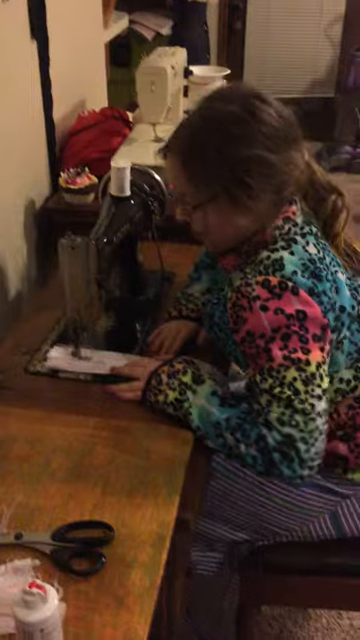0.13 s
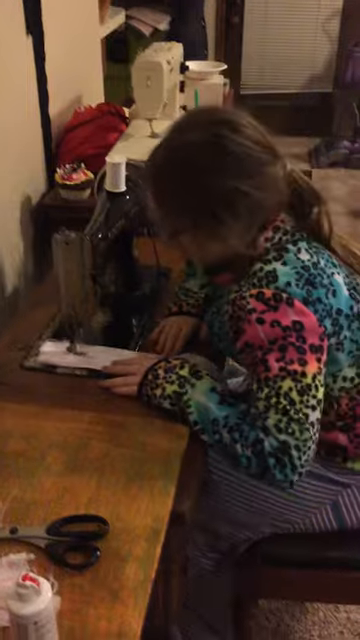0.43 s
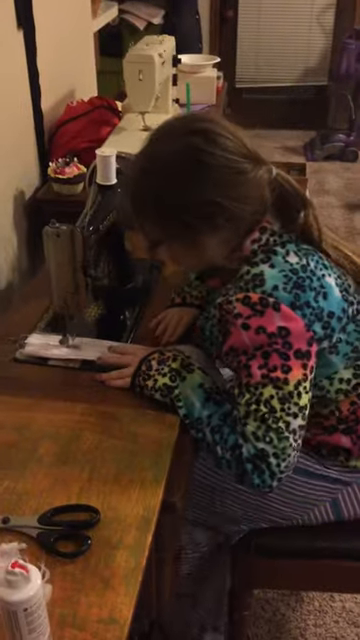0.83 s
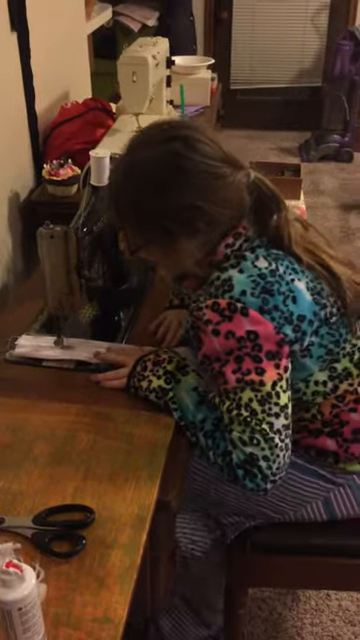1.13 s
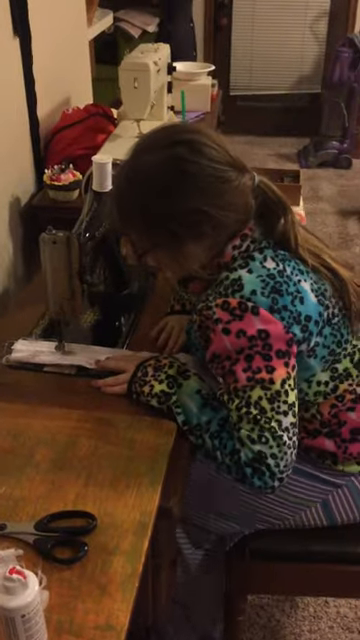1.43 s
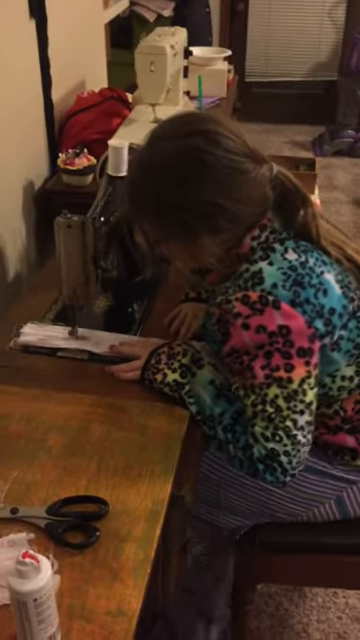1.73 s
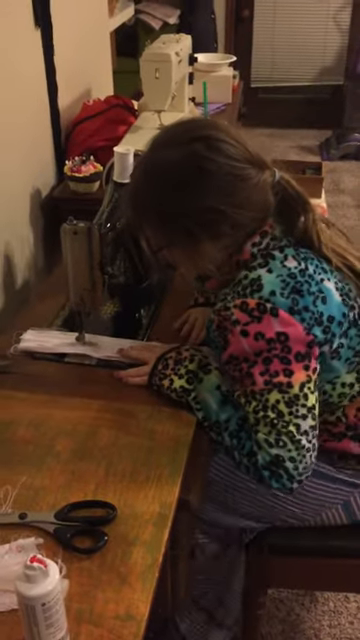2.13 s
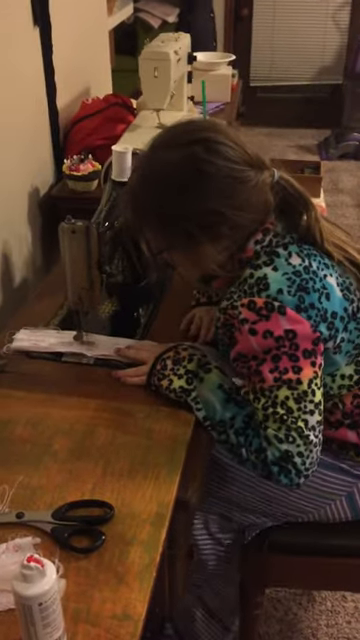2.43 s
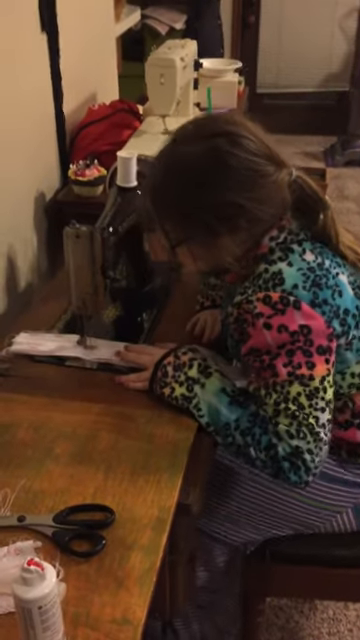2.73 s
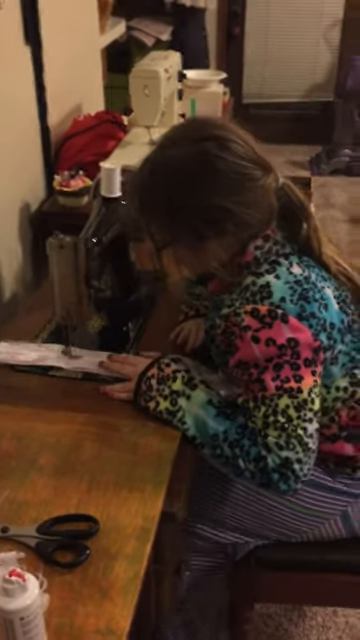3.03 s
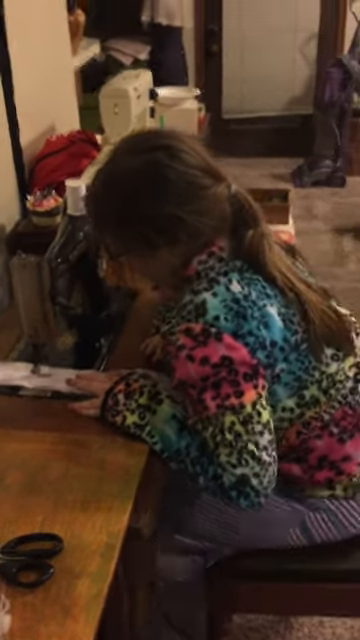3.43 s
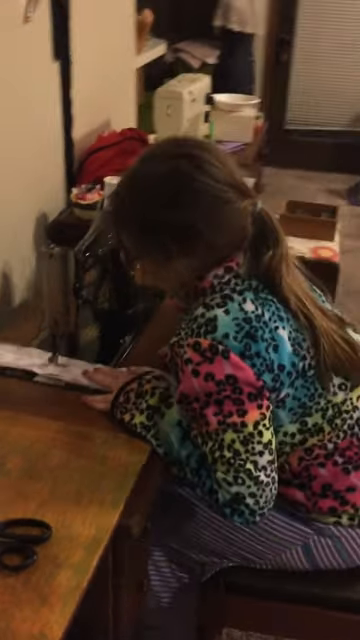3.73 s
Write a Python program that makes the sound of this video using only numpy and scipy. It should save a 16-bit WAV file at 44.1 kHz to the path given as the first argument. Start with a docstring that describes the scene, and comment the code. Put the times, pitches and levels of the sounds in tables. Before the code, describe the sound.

An old iron sewing machine starts abruptly and keeps stitching, slightly slower at first, then about ten stitches a second; dry squeaks, metallic clicks, table thumps and wooden treadle knocks, heard nearby in mono indoors.

```python
"""After a moment of silence a treadle sewing machine is heard at about ten stitches a second in a small room.
Filtered noise makes the cabinet drone and dense noise contacts the rattle; both follow the drive.
Each turn, a gliding sine and its octave squeak, a ringing push thumps the table, a noise burst clacks;
then the joint squeaks back and rasps upwards, and shuttle and feed click in between.
From time to time the treadle knocks: decaying modes of the wooden cabinet under a low noise grumble."""
import sys
import numpy as np
from scipy import signal
from scipy.fft import rfft, irfft
from scipy.io import wavfile
from scipy.ndimage import uniform_filter1d

SR = 44100
rng = np.random.default_rng(int(sys.argv[2]) if len(sys.argv) > 2 else 0)


def put_to_file(sound):
    """Save the sound as 16-bit audio at rate SR, in the file named by the first command-line argument."""
    columns = np.atleast_2d(sound).T  # one column per channel
    safe = np.clip(columns, -1, 1)
    whole_steps = np.round(safe * 32767)
    wavfile.write(sys.argv[1], SR, whole_steps.astype(np.int16))


N = 171549

# stitches: (time [s], squeak lead [s], squeak relative level [dB], squeak base pitch [Hz],
# squeak octave relative level [dB], return squeak relative level [dB], rasp relative level [dB],
# needle-bar clack relative level [dB], table thump relative level [dB])
STITCHES = [(0.146, 0.005, -23.5, 6940, -29, -51, -61, -32, -50),
            (0.274, 0.014, -52, 6730, -53, -47.5, -56, -40, -46),
            (0.395, 0.0072, -26, 7000, -30, -35.5, -50, -37, -44.5),
            (0.525, 0.0105, -38, 6870, -50.0, -40.5, -52.0, -40, -37.5),
            (0.649, 0.0091, -24, 7050, -32, -40, -52.0, -29.5, -36),
            (0.752, 0.0076, -23.5, 7000, -29, -41, -52, -30.5, -41),
            (0.86, 0.0071, -24.5, 6920, -31, -43, -43.0, -38, -47),
            (0.973, 0.0091, -25.5, 6920, -31.5, -46, -52.0, -35.5, -37),
            (1.083, 0.004, -32, 6820.0, -53, -52, -50, -35, -45),
            (1.185, 0.008, -22, 7040, -27.5, -32.5, -40.5, -30, -50),
            (1.277, 0.011, -24.5, 6780, -30, -35, -52.0, -29, -36.5),
            (1.371, 0.0093, -23.5, 7020.0, -29.0, -37, -43.5, -38, -32),
            (1.471, 0.0118, -34, 6880, -50.0, -34.5, -55, -31, -30.5),
            (1.568, 0.0053, -29.5, 6870.0, -48.5, -37, -52.0, -31, -37),
            (1.664, 0.0084, -22, 6890.0, -25, -30, -35.5, -30, -41),
            (1.747, 0.0102, -23, 6950, -26.5, -31, -42.5, -32.0, -38),
            (1.843, 0.0104, -27, 6860, -42, -47, -53, -31.5, -43),
            (1.937, 0.011, -23.5, 6940, -28, -38, -52.0, -30.5, -29),
            (2.037, 0.0095, -23.5, 6990, -26, -31.5, -36, -31.0, -39),
            (2.126, 0.021, -30.0, 6750, -43, -42, -52.0, -30, -35.5),
            (2.209, 0.01, -22.5, 6860.0, -30, -33.0, -41.0, -27.5, -35),
            (2.302, 0.01, -22.5, 6900, -26.5, -36.5, -45.5, -29, -50),
            (2.397, 0.01, -22.5, 6990, -29, -39, -42.5, -34.5, -33.0),
            (2.497, 0.0087, -27.5, 6800, -35, -49, -51.0, -30.5, -42),
            (2.584, 0.01, -41, 6960, -50.0, -34.5, -43, -31.5, -39),
            (2.672, 0.0098, -23.5, 7080, -28, -38, -52, -32, -36),
            (2.769, 0.0088, -20.5, 6915, -25.5, -33, -53, -31.5, -35),
            (2.866, 0.0083, -24, 6980, -28.5, -32.0, -50, -33.5, -32),
            (2.964, 0.0094, -24.5, 6880, -25.5, -33.5, -48.5, -29.5, -38),
            (3.051, 0.01, -23.5, 6870, -30.0, -38, -44, -30.5, -40),
            (3.138, 0.011, -25.5, 7030, -30, -38, -45.0, -29.5, -33),
            (3.233, 0.01, -26, 7050, -29.0, -34.5, -51.0, -32.5, -37.5),
            (3.332, 0.0095, -26, 7080, -32, -33.5, -45, -33.5, -36.5),
            (3.433, 0.0085, -20.5, 6910, -31, -30.0, -39.5, -30, -39.5),
            (3.529, 0.0103, -24, 7030, -31, -35.5, -42, -32.5, -44),
            (3.63, 0.0088, -28, 7140, -32.5, -53, -55, -34.5, -33.5),
            (3.742, 0.0121, -31, 6980.0, -36.5, -40.5, -61, -30.5, -33.5),
            (3.859, 0.009, -27, 7000, -34.5, -44, -43, -41, -33.5)]
# treadle knocks at the ends of its strokes: (time [s], relative level [dB], main ring [Hz])
KNOCKS = [(0.24, -24.5, 354), (0.452, -30, 323), (.806, -24, 345), (1.002, -25, 283.4), (1.294, -29, 349),
          (1.783, -21.5, 361), (1.9, -21, 282), (2.228, -24, 358), (2.355, -18.5, 274.2), (2.668, -30, 384),
          (3.124, -24, 346), (3.592, -25.5, 346)]
TABLE_HZ = 273  # main ring of the table top
RETURN_DELAY_S = .024  # stitch to middle of the rasp and of the return squeak's octave


def undb(db):
    """Decibels to gain."""
    return 10 ** (np.asarray(db) / 20)


def level(x, db):
    """Set the rms level."""
    return x * undb(db) / np.sqrt(np.mean(x ** 2))


def curve(at, rows):
    """Straight lines through the rows."""
    return np.interp(at, *np.array(rows).T)


def walk(rate_per_s):
    """Smooth random motion with an rms of 1."""
    k = max(int(SR / rate_per_s), 1)
    steps = np.repeat(rng.standard_normal(N // k + 1), k)
    return level(uniform_filter1d(steps, k)[:N], 0)


def convolve(x, response):
    """Play x through a response."""
    return signal.fftconvolve(x, response)[:N]


def colour(x, points, size=8192):
    """Causal minimum-phase filter of unit power, shaped by (frequency [Hz], relative level [dB])."""
    hz, db = np.array(points).T
    bin_hz = np.arange(size // 2 + 1) * SR / size
    gain = level(undb(np.interp(np.log(bin_hz + 1), np.log(hz), db)), 0)
    cepstrum = irfft(np.log(gain))
    cepstrum[1:size // 2] *= 2
    cepstrum[size // 2 + 1:] = 0
    return convolve(x, irfft(np.exp(rfft(cepstrum))))


def decay(t, t60_s):
    """Exponential decay by 60 dB in t60_s."""
    return np.exp(-np.log(1000) * t / t60_s)


def ring(t, hz, t60_s):
    """A mode that dies away from t = 0."""
    return np.sin(2 * np.pi * hz * t) * decay(t, t60_s)


def blows(t, rows, rise_s, decay_s):
    """Hard contacts: a short noise burst from each (time [s], level [dB])."""
    force = np.zeros(N)
    for s, db in rows:
        force += undb(db) * np.clip((t - s) / rise_s, 0, 1) * np.exp(-np.abs(t - s) / decay_s)
    return force * rng.standard_normal(N)


def head(x, points):
    """The iron head colours a blow and rings on at its modes."""
    # rings of the iron head: (frequency [Hz], t60 [s], gain [dB])
    head_modes = [(572, .14, 0), (728, .12, -6), (1122, .2, 3), (1656, .08, -10), (2483, .15, -5),
                  (3644, .12, -7), (5480, .1, -8), (5810, .08, -5)]
    t = np.arange(SR // 2) / SR
    modes = np.zeros(len(t))
    for hz, t60_s, db in head_modes:
        unit_peak = 2 * np.log(1000) / (t60_s * SR)  # gain of about 1 at resonance
        modes += undb(db) * unit_peak * np.cos(2 * np.pi * hz * t) * decay(t, t60_s)
    blow = colour(x, points)
    return blow + convolve(blow, modes)


def room(x, tail_db):
    """Direct sound plus the short tail of a furnished room, which soaks up the highest treble."""
    t60_s, onset_s, top_hz = 0.26, 0.0027, 11700
    t = np.arange(SR // 2) / SR
    tail = rng.standard_normal(len(t)) * decay(t, t60_s) * np.clip(t / onset_s - 1, 0, 1)
    soft = signal.sosfilt(signal.butter(1, top_hz, fs=SR, output="sos"), tail)
    return x + undb(tail_db) * convolve(x, soft / np.sqrt(np.sum(tail ** 2)))


def drone(drive):
    """The running flywheel and belt shake the cabinet and keep the table top ringing."""
    # colour of the wooden cabinet: (frequency [Hz], relative level [dB])
    cabinet_colour = [(20, -39), (40, -35), (55, -12), (72, -11.5), (100, -10), (135, -3.5), (180, -1),
                      (225, -15.5), (275, -1), (350, -5.5), (450, -17.5), (900, -29), (3000, -89)]
    cabinet_rms_db, table_rms_db, table_t60_s = -42, -45.5, .2
    shake = rng.standard_normal(N) * drive * undb(3.5 * walk(40))
    response = ring(np.arange(SR // 2) / SR, TABLE_HZ, table_t60_s)
    top = convolve(rng.standard_normal(N) * drive, response)
    top = signal.sosfilt(signal.butter(2, .7 * TABLE_HZ, "high", fs=SR, output="sos"), top)
    return level(colour(shake, cabinet_colour), cabinet_rms_db) + level(top, table_rms_db)


def grumble(t):
    """The treadle bearing grumbles at each knock: a low-coloured noise burst."""
    # colour of the bearing: (frequency [Hz], relative level [dB])
    bearing_colour = [(40, -42), (90, -19.5), (140, -18), (220, -2.5), (330, 0), (450, -9), (650, -15),
                      (1200, -14.5), (4000, -29.5)]
    trim_db, rise_s, decay_s = -2, 0.018, 0.018
    rub = blows(t, [(s, db) for s, db, _ in KNOCKS], rise_s, decay_s)
    return undb(trim_db) * colour(rub, bearing_colour)


def treadle(t):
    """Soft knocks of the treadle ring the wooden cabinet."""
    # rings of the cabinet: (frequency before scatter [Hz], t60 [s], gain [dB])
    cabinet_modes = [(136, 0.15, -16), (174.6, 0.15, -11.5), (266.7, 0.11, -1.5), (362, .09, -28),
                     (557, 0.077, -6)]
    trim_db, main_t60_s, push_s = 1.5, 0.14, 0.024
    scatter = 0.024  # share of the mode pitch, rms
    out = np.zeros(N)
    for s, db, hz in KNOCKS:
        near = (t > s) & (t < s + .5)
        u = t[near] - s
        knock = ring(u, hz, main_t60_s)
        for mode_hz, t60_s, gain_db in cabinet_modes:
            knock += undb(gain_db) * ring(u, mode_hz * (1 + scatter * rng.standard_normal()), t60_s)
        out[near] += undb(db + trim_db) * np.minimum(u / push_s, 1) * knock
    return out


def thumps(t):
    """Each down-stroke of the needle bar pushes the table top, which rings briefly."""
    trim_db, lead_s, push_s, t60_s = 12.5, 0.00793, 0.018, 0.14
    scatter = .035  # share of the pitch, rms
    out = np.zeros(N)
    for (s, *_, db), detune in zip(STITCHES, rng.standard_normal(len(STITCHES))):
        u = np.maximum(t - s + lead_s, 0)
        push = np.minimum(u / push_s, 1) ** 2
        out += undb(db + trim_db) * push * ring(u, TABLE_HZ * (1 + scatter * detune), t60_s)
    return out


def rattle(t, drive):
    """Dense small contacts of the loose linkage, stronger and brighter at some places in the turn."""
    # play of the linkage: (share of the turn after the stitch time [-], relative level [dB])
    play = [(0, 6), (.15, 9), (.28, 6.5), (.42, 8), (.52, 8), (.62, 7), (.72, 6.5), (.85, 11), (1, 7)]
    # extra brightness: (share of the turn after the stitch time [-], treble gain [dB])
    brightness = [(0, -4.5), (.15, -10.5), (.28, 2.5), (.42, -7.5), (.52, -7), (.62, 0), (.72, -5),
                  (.85, -9), (1, 3)]
    # colour of the iron head: (frequency [Hz], relative level [dB])
    iron_colour = [(60, -18), (250, -7), (500, -4.5), (800, -2), (1050, -0.5), (1300, 1), (1900, -4.5),
                   (2500, -0.5), (3200, -6.5), (3700, -4.5), (4800, -8.5), (5800, -6), (8000, -10),
                   (11000, -14), (15000, -21)]
    rms_db, contacts_per_s, spread_db, contact_decay_s = -36.5, 600, 2, 0.0027
    bright_hz = 3630
    bright_per_drive = 0.95  # a harder drive brightens the rattle [dB per dB]
    times = np.array(STITCHES)[:, 0]
    turn = np.interp(t, times, np.arange(len(times))) % 1
    strength = undb(spread_db * np.clip(rng.standard_normal(N), -2, 2))
    contacts = (rng.random(N) < contacts_per_s / SR) * strength
    power = convolve(contacts ** 2, np.exp(-t[:SR // 20] / contact_decay_s))
    chatter = np.sqrt(np.abs(power)) * rng.standard_normal(N)
    force = chatter * drive * undb(curve(turn, play) + 0.79 * walk(120))
    dull = signal.sosfiltfilt(signal.butter(2, bright_hz, fs=SR, output="sos"), force)
    bright = (force - dull) * drive ** bright_per_drive * undb(curve(turn, brightness))
    return level(head(dull + bright, iron_colour), rms_db)


def needle_and_shuttle(t):
    """The needle bar clacks at each stitch; shuttle and feed click in between, some dull, some bright."""
    # shuttle and feed clicks: (time [s], clack relative level [dB], bright tick relative level [dB])
    clicks = [(0.212, -32.5, -54), (0.303, -29.5, -44), (0.339, -31.5, -32.5), (0.361, -32, -27.5),
              (0.425, -27.5, -35), (0.461, -30, -41), (0.593, -26.5, -36), (0.614, -23.5, -30),
              (0.718, -27.5, -40), (0.826, -35, -33.5), (0.888, -27, -36), (0.91, -28.5, -47),
              (0.938, -31, -53), (0.998, -25.5, -46), (1.11, -24, -51), (1.157, -27, -26.5),
              (1.247, -27, -26.5), (1.342, -27, -32), (1.396, -28, -47), (1.437, -28, -31.5),
              (1.493, -29, -30), (1.542, -30, -34), (1.615, -24, -32), (1.679, -45, -34), (1.811, -30, -30),
              (1.862, -27, -52), (1.908, -25.5, -56), (2.008, -30, -36), (2.057, -34, -29.5),
              (2.173, -39, -34), (2.232, -38, -31), (2.271, -28.5, -31), (2.365, -24.5, -40),
              (2.42, -38, -37), (2.444, -30, -46), (2.466, -30, -38), (2.555, -27.5, -53),
              (2.587, -24.5, -33), (2.644, -34, -47), (2.691, -26.5, -45), (2.738, -30, -27),
              (2.834, -25, -43), (2.889, -46, -35), (2.934, -28, -30), (3.02, -28.5, -36),
              (3.053, -31, -26.5), (3.106, -31, -33), (3.202, -26, -45), (3.3, -32.5, -33),
              (3.402, -27.5, -30), (3.498, -26, -29), (3.587, -31, -32), (3.709, -43, -31),
              (3.806, -38, -29.5), (3.884, -31, -29.5)]
    # colour of the clacks: (frequency [Hz], relative level [dB])
    clack_colour = [(60, -28), (250, -2), (600, -5), (1100, 3), (1600, 4), (2500, 2), (3500, 0.5),
                    (4800, -5.5), (6000, 0), (8000, -8), (15000, -13)]
    # colour of the bright ticks: (frequency [Hz], relative level [dB])
    tick_colour = [(500, -16), (2500, 0.5), (4500, 2.5), (5800, 1), (8000, -2.5), (12000, -1.5),
                   (15500, -8)]
    needle_trim_db, needle_lead_s, needle_rise_s, needle_decay_s = 10, .005, .0065, 0.0065
    shuttle_trim_db, tick_trim_db, click_rise_s, click_decay_s = -0.5, 3, .0025, 0.0068
    needle_rows = [(s - needle_lead_s, db + needle_trim_db) for s, *_, db, _ in STITCHES]
    shuttle_rows = [(s, db + shuttle_trim_db) for s, db, _ in clicks]
    tick_rows = [(s, db + tick_trim_db) for s, _, db in clicks]
    needle = blows(t, needle_rows, needle_rise_s, needle_decay_s)
    shuttle = blows(t, shuttle_rows, click_rise_s, click_decay_s)
    ticks = blows(t, tick_rows, click_rise_s, click_decay_s)
    return head(needle + shuttle, clack_colour) + head(ticks, tick_colour)


def scrape(t):
    """The dry joint rasps upwards in pitch as it slides back: a wavering sine glide."""
    trim_db, width_s = 6, 0.0073
    mid_hz, glide_hz_per_s, waver_hz = 5690, 54000, 343
    out, waver = np.zeros(N), walk(2500)
    for s, *_, rasp_db, _, _ in STITCHES:
        near = np.abs(t - s - RETURN_DELAY_S) < .02
        u = t[near] - s - RETURN_DELAY_S
        pitch_hz = mid_hz + glide_hz_per_s * u + waver_hz * waver[near]
        swell = undb(rasp_db + trim_db) * np.exp(-(u / width_s) ** 2)
        out[near] += swell * np.sin(2 * np.pi * np.cumsum(pitch_hz) / SR)
    return out


def shift_colour(x):
    """No two contacts sound alike: overlapping half-octave bands swell and fade independently."""
    flicker_db, flicker_per_s = 2.6, 90
    octaves = np.log2(np.maximum(np.arange(N // 2 + 1) * SR / N, 1) / 500)
    place, spectrum = np.clip(octaves * 2, 0, 10), rfft(x)
    out = np.zeros(N)
    for k in range(11):
        band = irfft(spectrum * np.maximum(1 - np.abs(place - k), 0), N)
        out += band * undb(flicker_db * walk(flicker_per_s))
    return out


def grab(u, start_s, end_s):
    """Friction takes hold at start and lets go, half as fast, at end."""
    edge_s = .0006
    hold = np.tanh((u - start_s) / edge_s) - np.tanh((u - end_s) / (2 * edge_s))
    return hold.clip(0) / 2


def squeaks(t):
    """A dry joint sticks and slips: octave first, then a swelling whistle, trading strength; a return follows."""
    whistle_trim_db, fall_s, base, swell, swell_s = 1, 0.0076, .35, .8, .0055
    catch_hz, catch_s = 220.8, 0.0018  # the whistle starts sharp and settles
    sag_hz_per_s, sag_width_s, waver_hz = 4950, 0.0168, 95
    octave_trim_db, octave_lead_s, octave_end_s, octave_jitter_rad = 1, 0.00058, 0.0027, 0.59
    return_trim_db, return_s, return_width_s = 1, 0.030, 0.017  # the joint slides back
    return_octave_gain, return_octave_width_s = .7, .004
    trade_db, flutter_depth = 3, .12
    out = np.zeros(N)
    waver, grip, jitter, flutter = walk(600), walk(500), walk(1300), walk(1600)
    starts = rng.random(len(STITCHES))
    for (s, lead_s, db, hz, octave_db, return_db, *_), start in zip(STITCHES, starts):
        near = np.abs(t - s) < .06
        u = t[near] - s
        catch = catch_hz * np.exp(-np.maximum(u + lead_s, 0) / catch_s)
        sag = sag_hz_per_s * u * np.exp(-(u / sag_width_s) ** 2)
        pitch_hz = hz + catch - sag + waver_hz * waver[near]
        phase = 2 * np.pi * (start + np.cumsum(pitch_hz) / SR)
        stroke = undb(db) * grab(u, -lead_s, fall_s) * (base + swell * np.exp(-(u / swell_s) ** 2))
        bite = undb(octave_db + octave_trim_db) * grab(u, -lead_s - octave_lead_s, octave_end_s)
        back = undb(return_db + return_trim_db) * np.exp(-((u - return_s) / return_width_s) ** 2)
        back_swell = np.exp(-((u - RETURN_DELAY_S) / return_octave_width_s) ** 2)
        back_bite = return_octave_gain * back * back_swell
        share = np.arctan(undb(2 * trade_db * grip[near]))  # power split, whistle to octave
        whistle = undb(whistle_trim_db) * np.cos(share) * (stroke + back) * np.sin(phase)
        rough_phase = 2 * phase + octave_jitter_rad * jitter[near]
        octave = np.sin(share) * (bite + back_bite) * np.sin(rough_phase)
        out[near] += 2 * (whistle + octave) * (1 + flutter_depth * flutter[near])
    return out


def scene():
    """The whole machine in its room."""
    # how hard the machine is driven: (time [s], level [dB])
    effort = [(.12, 1.5), (.2, -2.5), (.27, 0), (.5, 0), (.65, 0), (.85, 1), (1.08, 0.5), (1.25, 2),
              (1.55, 3), (1.9, 2), (2.3, 2.5), (2.54, 1.5), (2.8, 2.5), (3.1, 3), (3.5, 1.5), (3.68, -1.5),
              (3.89, 3)]
    t = np.arange(N) / SR
    drive = undb(curve(t, effort))
    wood = drone(drive) + grumble(t) + treadle(t) + thumps(t)
    metal = shift_colour(rattle(t, drive) + needle_and_shuttle(t) + scrape(t))
    mix = room(wood, tail_db=-5) + room(metal, tail_db=-9.5) + room(squeaks(t), tail_db=-7.3)
    return mix[None]


def record(dry):
    """The sound opens after a moment of silence; a steep low-pass cuts the top."""
    start_s, fade_s, top_hz = .119, .003, 15100
    opening = np.clip((np.arange(N) / SR - start_s) / fade_s, 0, 1)
    return signal.sosfilt(signal.ellip(8, .2, 70, top_hz, fs=SR, output="sos"), dry * opening)


dry = scene()
out = record(dry)
put_to_file(out)
```